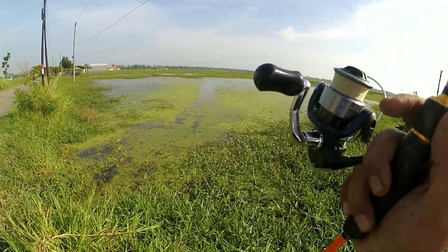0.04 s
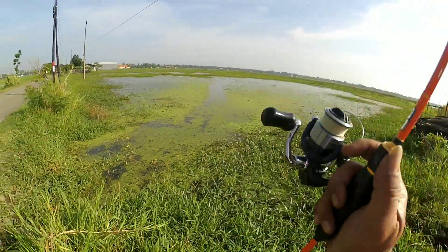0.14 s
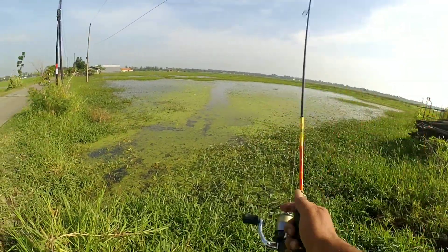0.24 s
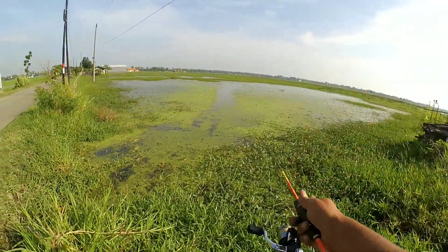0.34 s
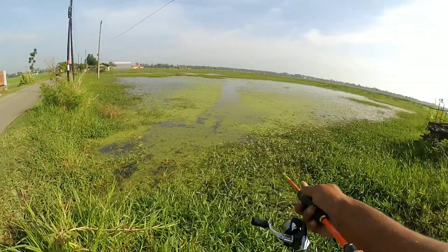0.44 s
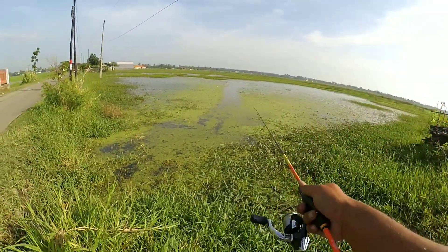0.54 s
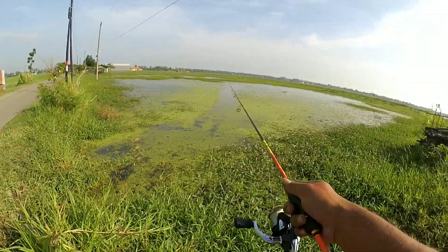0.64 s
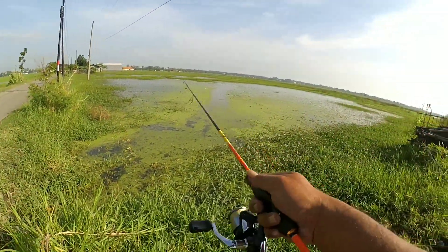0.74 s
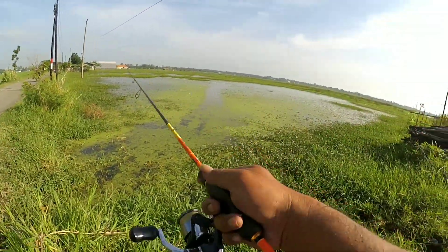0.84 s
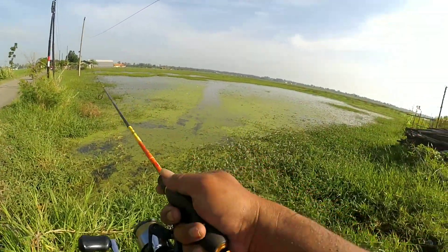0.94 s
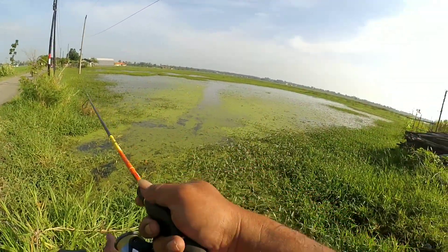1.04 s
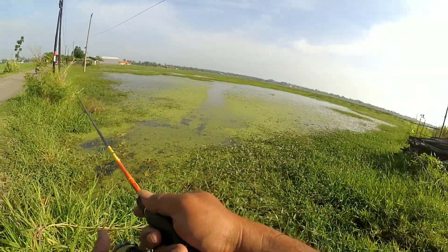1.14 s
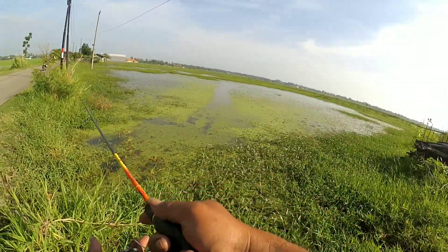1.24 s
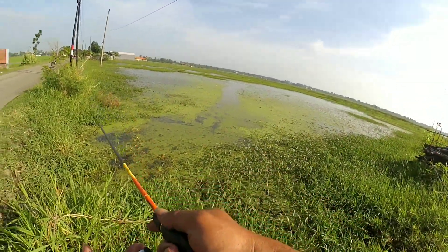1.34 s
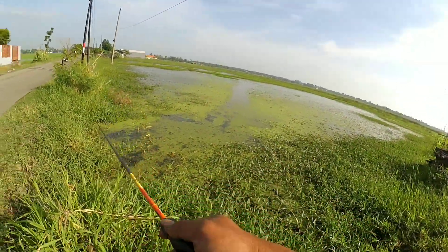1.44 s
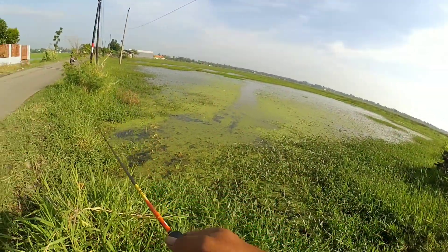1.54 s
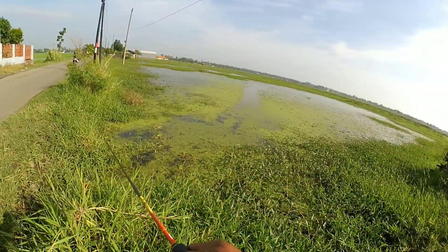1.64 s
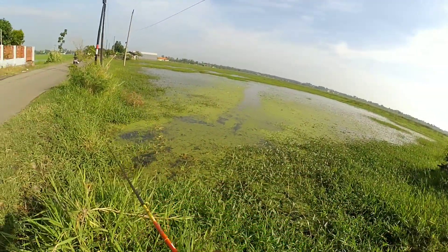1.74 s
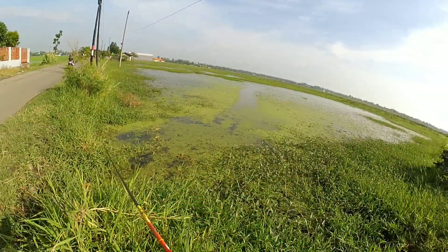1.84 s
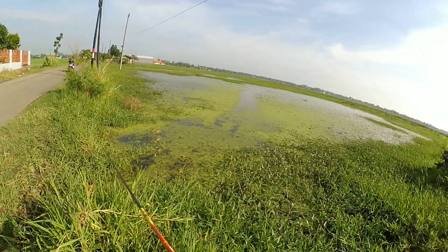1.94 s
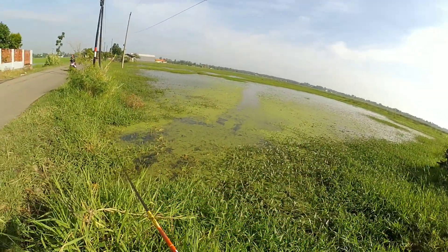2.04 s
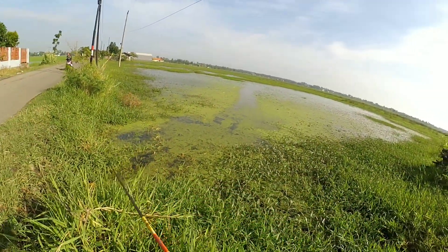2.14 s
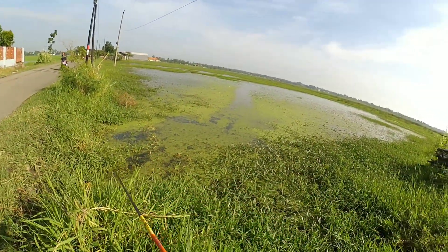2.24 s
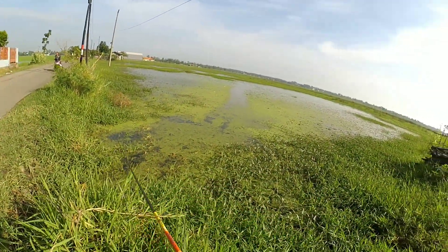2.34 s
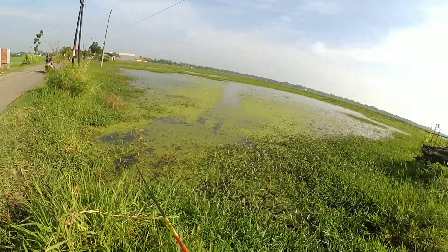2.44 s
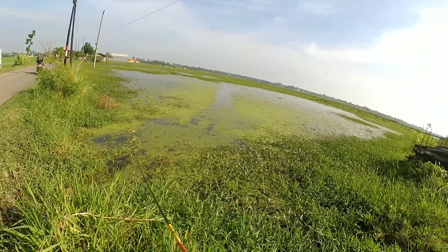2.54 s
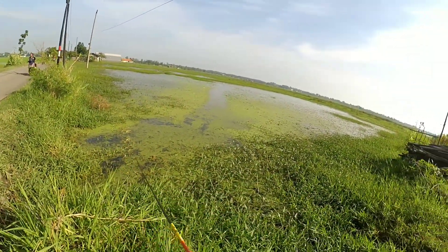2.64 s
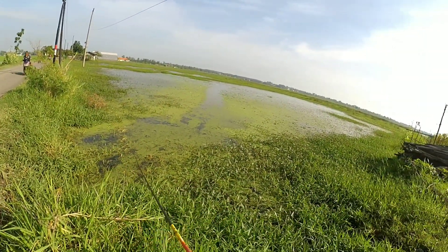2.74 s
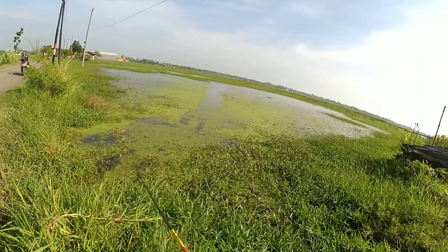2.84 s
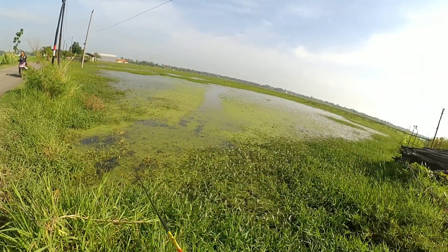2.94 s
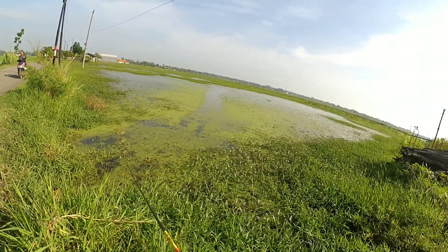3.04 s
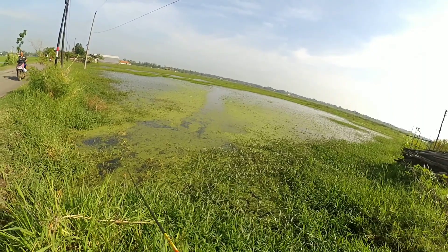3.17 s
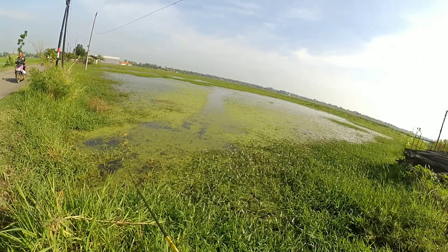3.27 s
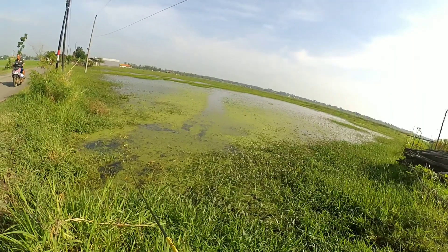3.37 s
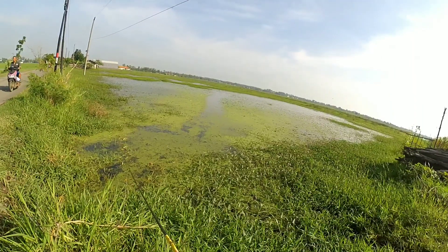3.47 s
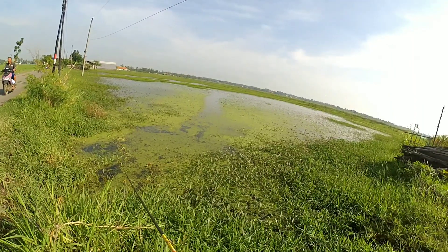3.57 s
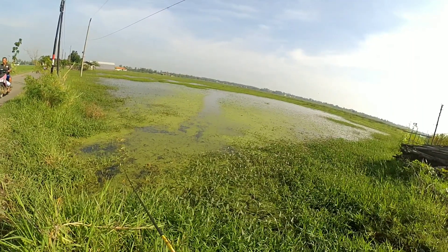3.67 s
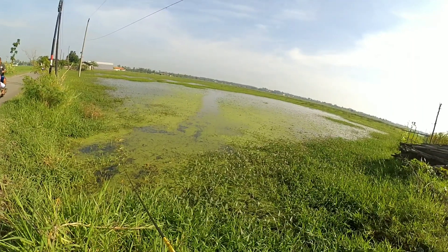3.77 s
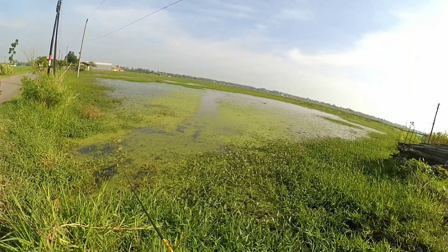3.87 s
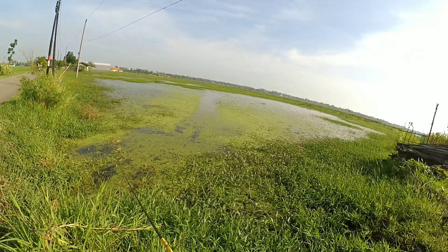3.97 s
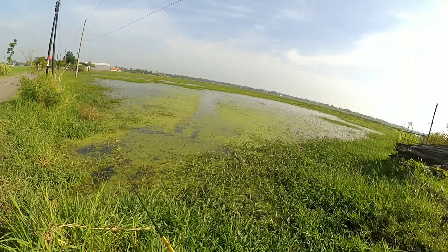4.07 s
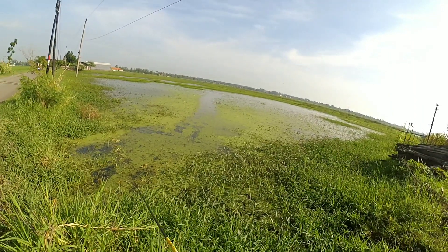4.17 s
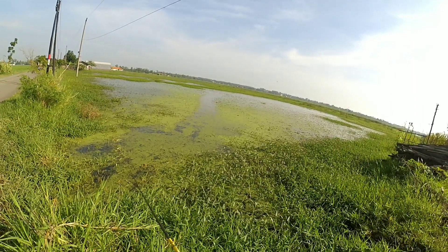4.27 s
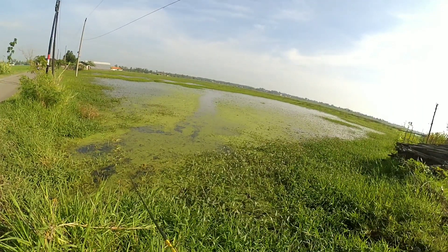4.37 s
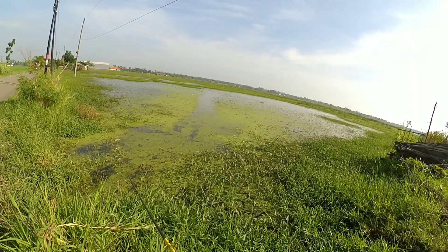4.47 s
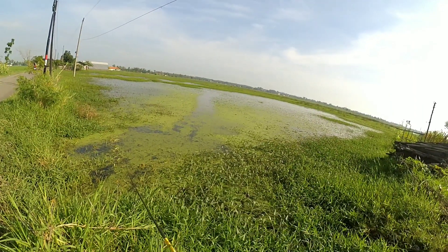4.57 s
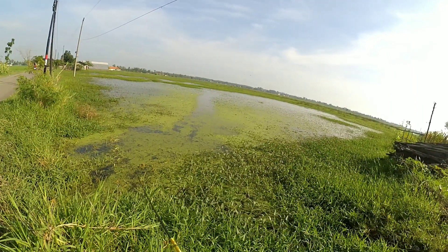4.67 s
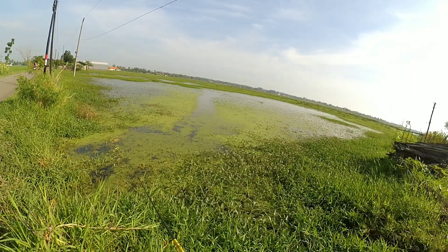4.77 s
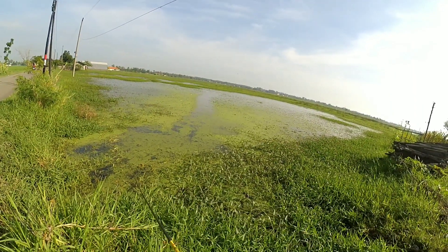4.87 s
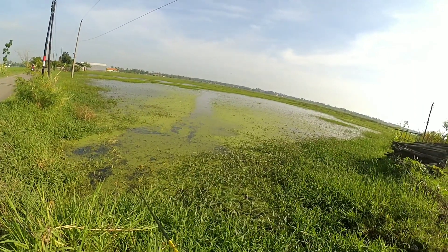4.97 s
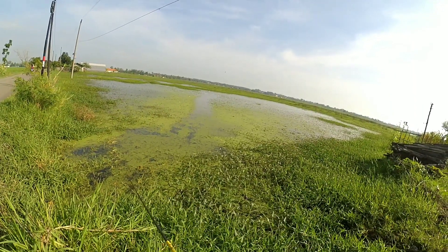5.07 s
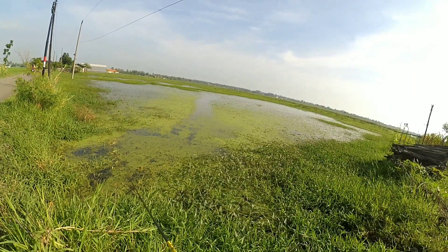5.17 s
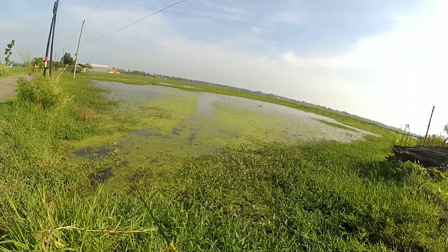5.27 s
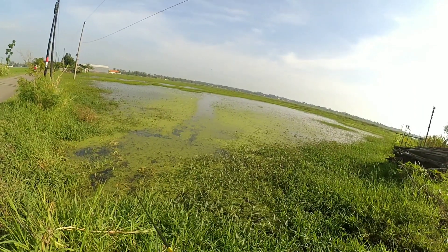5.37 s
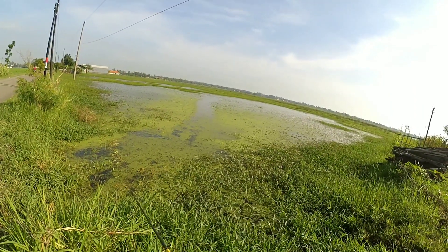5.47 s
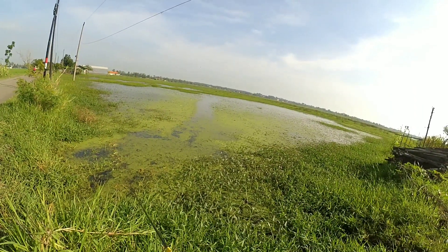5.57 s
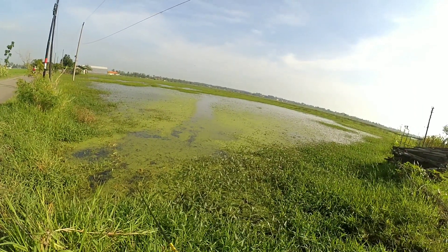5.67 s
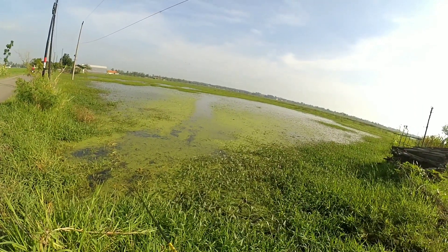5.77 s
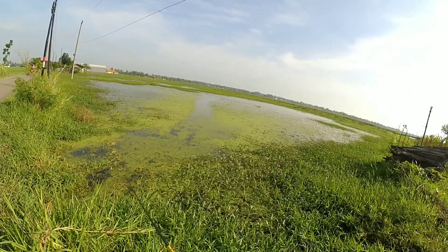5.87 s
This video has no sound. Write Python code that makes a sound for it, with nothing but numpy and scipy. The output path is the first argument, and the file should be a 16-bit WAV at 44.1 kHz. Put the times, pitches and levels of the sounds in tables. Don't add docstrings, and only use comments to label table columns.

```python
import sys
import numpy as np
from scipy import signal
from scipy.fft import rfft, irfft, next_fast_len
from scipy.io import wavfile
from scipy.ndimage import map_coordinates

SR = 44100
rng = np.random.default_rng(int(sys.argv[2]) if len(sys.argv) > 2 else 0)


def ratio(d):
    e = np.asarray(d, float) / 20
    return 10 ** e


def wav_record(signal):
    frames = np.transpose(np.atleast_2d(signal))
    bounded = np.clip(frames, -1, 1)
    quanta = np.round(bounded * 32767).astype(np.int16)
    wavfile.write(sys.argv[1], SR, quanta)


N = 260410


def in_time(rows):
    times, *columns = np.transpose(rows)
    return [np.interp(np.arange(N) / SR, times, column) for column in columns]


def rms_one(x):
    return x / np.sqrt(np.mean(x ** 2) + 1e-20)


def band(x, low_hz, high_hz):
    edges_hz = [low_hz, min(high_hz, .45 * SR)]
    return signal.sosfilt(signal.butter(2, edges_hz, "band", fs=SR, output="sos"), x)


def drift(rate):
    knots = rng.standard_normal(400)
    return map_coordinates(knots, [5 + np.arange(N) / SR * rate], order=3, mode="wrap")


def swell(middle_s, spread_s):
    return np.exp(-.5 * ((np.arange(N) / SR - middle_s) / spread_s) ** 2)


def patchy_noise(shared_db, own_db):
    white = rng.standard_normal((2, N))
    together = drift(9.0)
    edges = 100 * 2 ** (np.arange(23) / 3)
    out = np.zeros(N)
    for k, (low_hz, high_hz) in enumerate(zip(edges, edges[1:])):
        flicker_db = shared_db * together + own_db * drift(15.0)
        out += band(white[k % 2], low_hz, high_hz) * ratio(flicker_db)
    return out


def colour(x, spectrum, rings=()):
    size = next_fast_len(N)
    hz = np.arange(size // 2 + 1) * SR / size + 1
    corner_hz, corner_db = np.transpose(spectrum)
    gain_db = np.interp(np.log(hz), np.log(corner_hz), corner_db)
    for centre_hz, width_hz, top_db in rings:
        gain_db = gain_db + top_db / (1 + (2 * (hz - centre_hz) / width_hz) ** 2)
    return rms_one(irfft(rfft(x, size) * ratio(gain_db), size)[:N])


def three_parts(x):
    size = next_fast_len(N)
    hz = np.arange(size // 2 + 1) * SR / size
    low = 1 / (1 + (hz / 1000) ** 4)
    high = 1 - 1 / (1 + (hz / 4000) ** 4)
    return [rms_one(irfft(rfft(x, size) * part, size)[:N]) for part in (low, 1 - low - high, high)]


def passage(closest_s, gap_m):
    road_speed = 5.45
    along_m = road_speed * (np.arange(N) / SR - closest_s)
    distance_m = np.hypot(along_m, gap_m)
    return 20 * np.log10(gap_m / distance_m), along_m / distance_m


def field():
    # [f/Hz, level/dB per Hz]
    spectrum = [(70, -25), (120, -6), (200, -10.5), (340, -4.5), (500, -17.5), (1100, -25.5), (2350, -45),
                (4600, -35), (7600, -42.5), (8700, -45), (11300, -48), (13000, -43.5), (15200, -44.5)]
    # [f/Hz, width/Hz, height/dB]
    humps = [(1500, 240, 14), (3530, 1400, 11.5), (6220, 1100, 7), (9540, 1950, 15.5), (10500, 600, 11.5)]
    far_db = -53.5 - 3 * swell(0, .16)
    far = ratio(far_db) * colour(patchy_noise(shared_db=-0.9, own_db=1.5), spectrum, humps)
    lumps = rms_one(band(rng.standard_normal(N), 25.3, 103)) * ratio(3.3 * drift(4.94))
    sway = rms_one(band(rng.standard_normal(N), 15.0, 17.0))
    dying_gust_db = 3.5 * swell(0, 0.21)
    draught_db = 7 * swell(5.2, .3)
    wind_db = -46 + .7 * drift(2.4) + draught_db + dying_gust_db
    return far + ratio(wind_db) * lumps + ratio(-49.5) * sway


def exhaust():
    # [t/s, firings per s]
    speed = [(0.0, 34.4), (0.95, 34.8), (1.13, 34.5), (1.63, 35.1), (2.0, 35.1), (2.55, 35.8), (4.93, 36.5),
             (5.57, 35.9), (5.9, 35.1)]
    # [multiple, level when closest/dB, share of the distance loss]
    strong_orders = [(1, -32, 1), (2, -31.5, 0.79), (3, -39.5, 0.79), (4, -34, 0.99), (5, -41.5, .5)]
    # [multiple, level/dB]
    weak_orders = [(6, -8), (7, -13.5), (8, -11.5), (9, -28), (10, -26), (11, -16), (12, -18), (13, -19),
                   (15, -16), (17, -29)]
    # [multiple, middle t/s, spread/s, level/dB]
    fades = [(1, 3.54, 0.26, -22), (4, 4.0, 0.16, -2.5), (4, 5.2, 0.16, -2), (5, 3.9, 0.074, -1),
             (4, 3.06, 0.17, -1), (3, 4.87, .15, -9), (3, 5.45, 0.24, -3), (5, 3, 0.027, 3),
             (2, 5.97, 0.13, -4)]
    loss_db, behind = passage(closest_s=5.13, gap_m=3.04)
    pipe_rear_db = 4.0
    angle = 2 * np.pi * np.cumsum(in_time(speed)[0]) / SR + .05 * drift(5.0) + 1.5

    orders = []
    for k, db, share in strong_orders:
        order_db = db + share * (loss_db + pipe_rear_db * behind)
        for multiple, middle_s, spread_s, fade_db in fades:
            if multiple == k:
                order_db = order_db + fade_db * swell(middle_s, spread_s)
        orders.append((k, order_db))
    mean_db = np.mean([db for k, db in orders], axis=0)
    for k, db in weak_orders:
        dull_db = 0.24 * (mean_db + 31.0)
        tail_db = -9.5 * (k > 8) * np.clip(behind, 0, 1)
        orders.append((k, mean_db + db + dull_db + tail_db))

    out = np.zeros(N)
    for k, db in orders:
        lead = .45 - 1.1 * (k == 3) + 2.0 * (k > 3) * (1 + behind) / 2
        level = ratio(db + (.2 + .1 * k) * drift(9.0))
        out += level * np.sin(k * angle + lead + .04 * k * drift(8.0))
    return -np.sqrt(2) * out, angle


def running_gear(angle):
    # [t/s, 0 head-on / 1 abeam / 2 from behind]
    facing = [(0, 0.1), (3.9, 0.5), (4.7, 0.77), (5.2, 1.27), (5.5, 1.67), (5.9, 1.44)]
    # [f/Hz, level/dB per Hz]
    ahead = [(120, -30), (200, 11.5), (272, 5), (541, -1.5), (1080, -30), (1660, -12), (2220, -22),
             (3370, -19.5), (4500, -33), (8480, -42.5), (9630, -40), (15100, -52.5)]
    # [f/Hz, level/dB per Hz]
    abeam = [(120, -9), (200, -18), (330, 3.5), (450, -2.5), (650, 1), (1040, -8), (1500, -9), (2200, -12),
             (3300, -17.5), (4500, -24), (8000, -32.5), (15100, -46)]
    # [f/Hz, level/dB per Hz]
    rear = [(120, -18), (200, 6), (287, 14), (582, -19), (1040, -6.5), (1630, -9), (1820, -9),
            (2480, -14.5), (3620, -28), (9290, -63), (10400, -64), (15100, -72)]
    # [level when closest/dB, share of the distance loss, extra from behind/dB]
    gear = [(-38, 1, -2), (-43.5, 0.94, -0.5), (-48.5, 1.28, -2)]
    # [middle t/s, spread/s, f/Hz, level over rattle/dB]
    glints = [(3.2, 0.24, 2540, -2.5), (3.3, 0.36, 3390, -7), (3.2, 0.26, 1675, -5.5),
              (3.4, 0.48, 2040, -8), (3.3, 0.26, 2930, -11), (3.3, 0.48, 1500, -10), (3.8, 0.24, 1737, -5),
              (4.25, 0.36, 6150, -14), (4.5, 0.34, 1680, -3.5), (4.88, 0.16, 3310, -6),
              (4.9, 0.21, 2035, -3), (5.03, 0.075, 1730, 1.5), (4.98, .12, 2533, -1),
              (5.2, 0.13, 2640, -1.5), (5.3, 0.15, 1330, -3), (5.35, 0.14, 704, -9), (5.38, 0.14, 834, -5),
              (5.45, 0.078, 2000, 0.5), (5.5, 0.078, 1610, 1.5), (5.55, .15, 2510, -1.5),
              (5.82, 0.13, 1630, -3), (5.8, 0.11, 1380, -4)]
    loss_db, behind = passage(closest_s=5.16, gap_m=1.84)
    aspect = in_time(facing)[0]
    levels_db = [db + share * loss_db + rear_db * behind + .5 * drift(3.0) for db, share, rear_db in gear]
    levels_db[2] = levels_db[2] - 4 * swell(5.82, 0.068)
    throb = ratio(0.82 * np.cos(angle) + 0.72 * np.cos(2 * angle))
    raw = patchy_noise(shared_db=.3, own_db=.9)
    out = np.zeros(N)
    for k, spectrum in enumerate((ahead, abeam, rear)):
        share = np.clip(1 - np.abs(aspect - k), 0, 1)
        for db, part in zip(levels_db, three_parts(colour(raw, spectrum))):
            out += share * ratio(db) * part
    white = rng.standard_normal(N)
    half_width = .058 / 2
    for middle_s, spread_s, hz, db in glints:
        ring = rms_one(band(white, hz * (1 - half_width), hz * (1 + half_width)))
        out += swell(middle_s, spread_s) * ratio(levels_db[1] + db) * ring
    return out * throb


def drone():
    t = np.arange(N) / SR
    fade_db = -30 * np.clip(t - 3.6, 0, 1)
    db = -52.5 + 9.5 * swell(2.6, 0.23) + 1.9 * drift(2.5) + fade_db
    return np.sqrt(2) * ratio(db) * np.sin(2 * np.pi * 40.3 * t + 0.56 * drift(3.1))


def bird():
    # [t/s, level/dB, start f/Hz, end f/Hz, length/s]
    peeps = [
        (.04, -71, 4700, 4400, .08),
        (.09, -70, 4400, 4100, .08),
        (.12, -70, 4750, 4500, .07),
        (.47, -70, 6660, 6200, .08),
        (1.085, -65, 5850, 5850, .025),
        (2.825, -68.5, 9700, 9800, .066),
        (5.755, -58, 8800, 8250, .028),
    ]
    # [t/s, level/dB]
    call = [(1.655, -72), (1.89, -64), (2.07, -71), (2.126, -70), (2.34, -67), (2.6, -65), (2.845, -64),
            (3.091, -69), (3.34, -69), (3.585, -69)]
    out = np.zeros(N)
    flutter_db = 6.0 * drift(320.0)
    steady = [(s, db, 4400, 4230, .05) for s, db in call]
    for s, db, start_hz, end_hz, length_s in [*peeps, *steady]:
        count, i = round(length_s * SR), round(s * SR)
        whistle = np.sin(2 * np.pi * np.cumsum(np.linspace(start_hz, end_hz, count)) / SR)
        out[i:i + count] += ratio(db + flutter_db[i:i + count]) * np.hanning(count) * whistle
    return out


def clicks(rows, length_s, body_db):
    out = np.zeros(N)
    t = np.arange(round(.03 * SR)) / SR
    for s, db, hz in rows:
        burst = rng.standard_normal(len(t)) * ratio(-60 * t / length_s)
        ring = band(burst, hz * .85, hz * 1.18)
        crack = band(burst, 1800, 12000)
        knock = band(burst, 900, 2000)
        hit = .7 * ring / np.abs(ring).max() + .8 * crack / np.abs(crack).max()
        i = round(s * SR)
        out[i:i + len(t)] += ratio(db) * (hit + ratio(body_db) * knock / np.abs(knock).max())
    return out


def reel():
    # [t/s, peak level/dB, ring f/Hz]
    ticks = [(.296, -45, 6550), (.3154, -45, 6500), (.38, -43, 5800), (.3904, -43, 8500),
             (.4034, -45, 6200), (.4199, -39, 7550), (.5104, -55, 6400), (1.1804, -54, 8000),
             (1.3548, -40, 4000), (1.3575, -35, 6840), (1.389, -46, 9100), (1.802, -49, 6000),
             (1.8074, -51, 6600), (1.828, -42.5, 3870), (1.9304, -51, 7500), (2.1645, -55, 7000),
             (2.3032, -53, 8400), (2.762, -56, 6250), (2.802, -45, 4200), (3.165, -50, 10500),
             (4.076, -42, 7200), (4.599, -42, 7840)]
    # [t/s, peak level/dB, ring f/Hz]
    knocks = [
        (.187, -48, 6800),
        (.3277, -46, 9500),
        (1.203, -44, 3520),
        (1.3798, -33, 9600),
        (1.393, -44, 2720),
        (1.6958, -42, 3500),
    ]
    # [t/s, peak level/dB, ring f/Hz]
    snaps = [
        (1.36, -40, 6350),
        (1.3762, -30, 5900),
        (1.384, -35, 3600),
        (1.6929, -38.5, 5240),
    ]
    return (clicks(ticks, length_s=0.0046, body_db=-27) + clicks(knocks, length_s=0.013, body_db=-2)
            + clicks(snaps, length_s=0.024, body_db=-1.5))


def cast():
    # [f/Hz, level/dB per Hz]
    torn_air = [(350, -45), (700, 0), (1500, -4), (2400, 0.5), (3500, 0.5), (5000, -5.5), (9200, -5.5),
                (15100, -27)]
    # [middle t/s, spread/s, rod swish level/dB, line hiss level/dB]
    strokes = [
        (.387, .02, -49, -63),
        (.5, 0.16, -64.5, -69),
        (.98, 0.16, -67.5, -64),
        (1.193, 0.026, -52.5, -72),
        (2.87, 0.045, -71, -68),
    ]
    swish = colour(rng.standard_normal(N) * ratio(2.6 * drift(260.0)), torn_air)
    line = rms_one(band(rng.standard_normal(N), 12000, 21000))
    return sum(swell(middle_s, spread_s) * (ratio(swish_db) * swish + ratio(line_db) * line)
               for middle_s, spread_s, swish_db, line_db in strokes)


def squeak(rows, overtone_db, rough_adds_db):
    first, last = rows[0], rows[-1]
    silent_start = (first[0] - .01, first[1], -120, 0)
    silent_end = (last[0] + .01, last[1], -120, 0)
    hz, db, rough = in_time([silent_start, *rows, silent_end])
    jitter = rms_one(band(rng.standard_normal(N), 120, 700))
    chop = rms_one(band(rng.standard_normal(N), 120, 700))
    angle = 2 * np.pi * np.cumsum(hz * (1 + .12 * rough * jitter)) / SR
    octave = ratio(overtone_db + rough_adds_db * rough) * np.sin(2 * angle)
    tone = np.sin(angle) + octave + ratio(-18) * np.sin(3 * angle)
    return np.sqrt(2) * ratio(db + 3.0 * chop) * tone


def reel_squeaks():
    # [t/s, f/Hz, level/dB, roughness 0-1]
    high = [
        (1.083, 3880, -68, .3),
        (1.11, 3920, -59, 0.3),
        (1.14, 3880, -52.5, .2),
        (1.152, 3380, -64, .7),
        (1.165, 2820, -52, .5),
        (1.175, 2800, -75, .5),
    ]
    # [t/s, f/Hz, level/dB, roughness 0-1]
    low = [
        (1.15, 2950, -75, .3),
        (1.165, 3150, -56, .15),
        (1.18, 3200, -55, .15),
        (1.188, 2900, -64, .75),
        (1.205, 2950, -64, .75),
        (1.225, 3100, -68, .6),
        (1.26, 3200, -71, .4),
        (1.3, 3250, -82, .4),
    ]
    return squeak(high, overtone_db=-12, rough_adds_db=2.0) + squeak(low, overtone_db=-2.0, rough_adds_db=22.5)


def scene():
    beat, angle = exhaust()
    motorcycle = beat + running_gear(angle)
    fishing = reel() + cast() + reel_squeaks()
    return (field() + motorcycle + drone() + bird() + fishing)[None]


def top_cut(x):
    return signal.sosfilt(signal.butter(12, 15290, fs=SR, output="sos"), x)


def record(dry):
    cut = signal.sosfilt(signal.cheby2(18, 45, 15600, fs=SR, output="sos"), dry)
    return top_cut(cut - .001)


dry = scene()
out = record(dry)
wav_record(out)
```